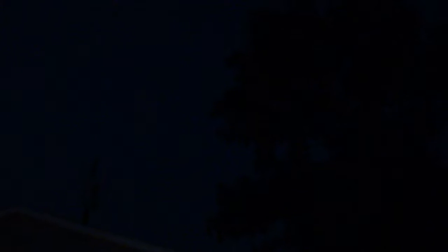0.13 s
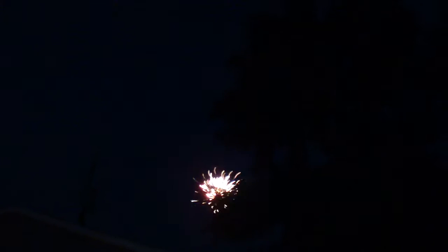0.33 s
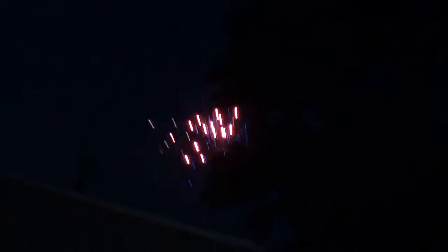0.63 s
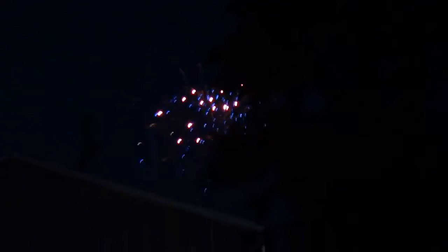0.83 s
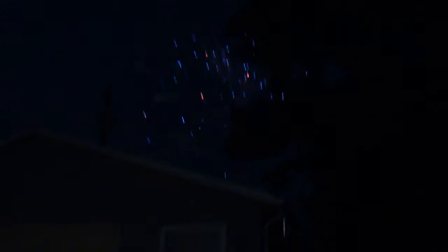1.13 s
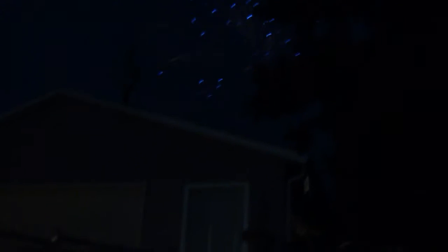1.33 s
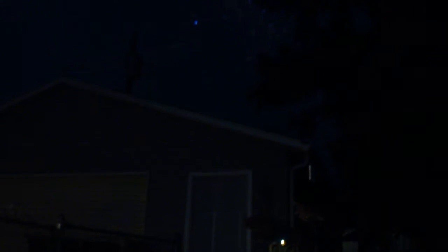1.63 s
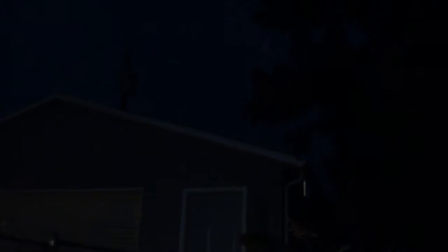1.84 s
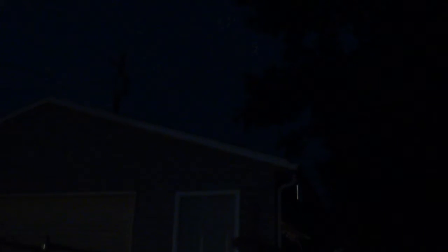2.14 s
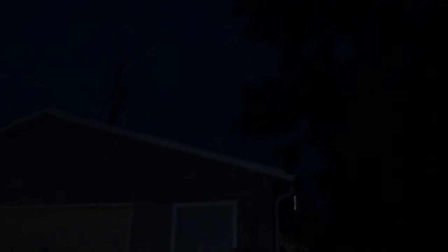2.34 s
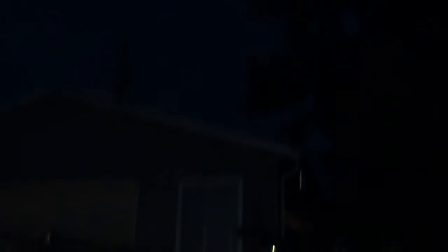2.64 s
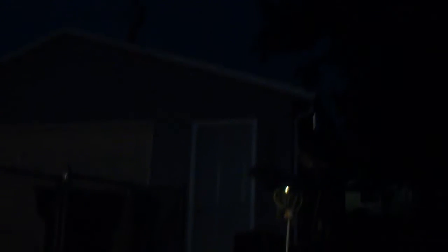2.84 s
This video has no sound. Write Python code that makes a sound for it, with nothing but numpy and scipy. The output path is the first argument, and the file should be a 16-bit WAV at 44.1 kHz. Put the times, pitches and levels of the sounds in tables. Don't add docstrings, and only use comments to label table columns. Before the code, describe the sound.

Over a constant low machine hum and fan rush in a residential yard, a single firework cracks violently, distorting the microphone, then booming echoes and a bright, airy tail fade before several dull distant shells thump.

```python
import sys
import numpy as np
from scipy import signal
from scipy.fft import rfft, irfft, next_fast_len
from scipy.io import wavfile
from scipy.ndimage import map_coordinates

SR = 44100
rng = np.random.default_rng(int(sys.argv[2]) if len(sys.argv) > 2 else 0)


def decibels_to_gain(level_db):
    exponent = np.asarray(level_db, float) / 20
    return 10 ** exponent


def transcribe(signal):
    frames = np.atleast_2d(signal).T
    limited = np.clip(frames, -1, 1)
    pcm = np.round(limited * 32767).astype(np.int16)
    wavfile.write(sys.argv[1], SR, pcm)


N = 130977

# t/s, level/dB, sign, push/ms, front/ms
BURST = [
    (.76416, -.5, -1, .6, .025),
    (.76465, 6.5, 1, .52, .05),
    (.76505, -1, 1, 1.4, .04),
    (.76562, -4.5, 1, 1.6, .05),
    (.7663, 10.5, -1, 1.1, 1.0),
    (.7677, 8, -1, .5, .5),
]
# t/s, level/dB, sign, push/ms, front/ms
HOUSE_SLAPS = [
    (.7884, 4, -1, 1.1, .5),
    (.794, -9, -1, .3, .04),
    (.7982, 2, -1, .7, .3),
    (.8013, -4, -1, .3, .02),
    (.8022, -2, 1, .6, .15),
    (.8493, -1, 1, .6, .1),
    (.8608, 2, -1, .9, .4),
    (.8712, -4, 1, .35, .1),
    (.8925, -2, -1, .5, .1),
    (.8942, -4, 1, .35, .08),
]
# t/s, level/dB
ECHO_SWELL = [
    (0.768, -25),
    (.785, -11.5),
    (.81, -16),
    (.87, -16),
    (.95, -20.5),
    (1.15, -23.5),
    (1.3, -28),
    (1.6, -31.5),
    (2.1, -39),
]
# f/Hz, level/dB
WALL_COLOUR = [(40, -39), (120, -15.5), (260, -0.5), (520, -12), (770, -7), (1100, -14.5), (2200, -16),
               (10900, -40.5)]
# f/Hz, change/(dB per s)
AIR_LOSS = [(200, 1.5), (1500, -1.5), (4000, -1), (10000, -21)]
# f/Hz, level/(dB per Hz)
LEAF_COLOUR = [(500, -30), (1500, 0), (3000, -1.5), (5000, -9.5), (10900, -28)]
# t/s, peak level/dB, f/Hz, t60/s
YARD_BOOMS = [
    (.7685, -15, 282, 0.058),
    (.787, -32, 272, 0.53),
    (.797, -15, 742, 0.16),
    (.82, -18, 276, 0.08),
    (.845, -23, 200.1, 0.51),
    (.99, -20.5, 192, 0.21),
    (1.05, -19, 299, .25),
    (1.11, -20.5, 389, 0.16),
    (1.17, -21.5, 210, 0.16),
]
# t/s, peak level/dB, f/Hz, t60/s
FAR_SHELLS = [
    (1.521, -8.5, 304, 0.03),
    (1.55, -10.5, 356, 0.048),
    (1.76, -27.5, 767, 0.25),
    (2.356, -17.5, 360, 0.085),
    (2.723, -18, 460, .05),
    (2.75, -14.5, 430, 0.057),
    (2.818, -12.5, 365, 0.029),
]
SHAFT_MULTIPLES = [9, 10, 11, 15, 18, 19, 21, 22, 23, 24, 26, 28, 30, 39, 40, 48, 49, 56, 72, 86, 88, 100,
                   150, 157, 163, 168, 174]
# rms level/dB, drift/(dB per s)
SHAFT_TONES = [(-43.5, -0.2), (-40.5, -1.7), (-49.5, 2.1), (-78, 7.5), (-38.5, -1.6), (-46.5, -1.2),
               (-43, 0.5), (-32.5, -1.74), (-47.5, 1), (-40.5, 0.54), (-54.5, -5.3), (-50, 0), (-49, -1.3),
               (-49, -7.5), (-55, 1.5), (-54, 2.1), (-54.5, 2), (-52, -3), (-59.5, .1), (-60.5, 0.3),
               (-62, -2), (-67, 1), (-70, -6), (-66, 1), (-74, 0.5), (-69, -1), (-71, -2)]
# f/Hz, level/(dB per Hz)
FAN_COLOUR = [(30, -29), (200, -6), (380, -8.5), (590, -6), (1100, -12.5), (2100, -15.5), (6500, -35.5),
              (10900, -39.5)]

SLAPS_PER_S, SLAP_SPREAD_DB, SLAP_SHARE = 900, 2.5, .3
ECHO_DB = 2
LEAVES_S, LEAVES_DB, LEAVES_RISE_S, LEAVES_T60_S = 0.772, -18.5, 0.075, 1.57
SHAFT_HZ, FAN_DB = 58.92, -26
MAINS_HZ, MAINS_DB = 50, -46
START_S, BASS_HZ, TOP_HZ, CLIP_LEVEL = .0555, 140, 10930, .715
DUCK_DB, DUCK_S = -6, .012
SAG_DB, SAG_S = -6, 0.25


def unit(x):
    return x / np.sqrt(np.mean(x ** 2) + 1e-20)


def along(points, hz):
    f, v = np.transpose(points)
    return np.interp(np.log(hz + 1), np.log(f + 1), v)


def wobble(rate):
    knots = rng.standard_normal(int(N * rate / SR) + 4)
    return map_coordinates(knots, [np.arange(N) * rate / SR])


def filtered(x, response):
    m = next_fast_len(N + 8192)
    return irfft(rfft(x, m) * response(np.fft.rfftfreq(m, 1 / SR)), m)[:N]


def coloured_noise(colour):
    return unit(filtered(rng.standard_normal(N), lambda hz: decibels_to_gain(along(colour, hz))))


def blast():
    t = np.arange(N) / SR
    out = np.zeros(N)
    for s, db, sign, push_ms, front_ms in [*BURST, *HOUSE_SLAPS]:
        lag_ms = np.clip(t - s, 0, .05) * 1000
        push = (1 - lag_ms / push_ms) * np.exp(-lag_ms / push_ms)
        front = 1 - np.exp(-lag_ms / front_ms)
        out += np.sign(sign) * decibels_to_gain(db) * push * front
    return out


def echoes():
    t = np.arange(N) / SR
    chance, size = rng.random(N), rng.exponential(1, N)
    sign = np.sign(rng.standard_normal(N))
    slaps = (chance < SLAPS_PER_S / SR) * decibels_to_gain(SLAP_SPREAD_DB * np.minimum(size, 2)) * sign
    wash = rng.standard_normal(N)
    source = np.sqrt(SLAP_SHARE) * unit(slaps) + np.sqrt(1 - SLAP_SHARE) * wash
    near = unit(filtered(source, lambda hz: decibels_to_gain(along(WALL_COLOUR, hz))))

    s, db = np.transpose(ECHO_SWELL)
    hz, frame_s, z = signal.stft(near, SR, nperseg=512)
    travel_s = np.clip(frame_s - s[0], 0, 1.2)
    loss_db = along(AIR_LOSS, hz)[:, None] * travel_s
    far = signal.istft(z * decibels_to_gain(loss_db), SR, nperseg=512)[1][:N]

    tail_db = -12 * np.clip(t - s[-1], 0, None)
    level_db = np.interp(t, s, db) + tail_db + ECHO_DB + 1.1 * wobble(25.62)
    onset = np.clip((t - s[0]) / 0.0024, 0, 1)
    return onset * decibels_to_gain(level_db) * far


def trees():
    lag = np.clip(np.arange(N) / SR - LEAVES_S, 0, None)
    level_db = LEAVES_DB - 60 * lag / LEAVES_T60_S + wobble(39.5)
    rise = 1 - np.exp(-lag / LEAVES_RISE_S)
    return decibels_to_gain(level_db) * rise * coloured_noise(LEAF_COLOUR)


def thumps():
    out = np.zeros(N + SR)
    t = np.arange(SR // 4) / SR
    partials = [(1, 1), (.7, .6), (1.4, .35), (.3, .5)]
    for s, db, hz, t60 in [*YARD_BOOMS, *FAR_SHELLS]:
        waver = np.cumsum(rng.standard_normal(len(t))) * .02
        ring = sum(gain * np.sin(2 * np.pi * ratio * hz * t + waver) for ratio, gain in partials)
        envelope = decibels_to_gain(db + 3.5 - 60 * t / t60) * (1 - np.exp(-t / 0.0042))
        out[round(s * SR):][:len(t)] += envelope * ring
    return out[:N]


def compressor():
    t = np.arange(N) / SR
    turn = 2 * np.pi * SHAFT_HZ * t + .03 * wobble(2) + .006 * wobble(40)
    tones = np.zeros(N)
    for k, (db, drift) in zip(SHAFT_MULTIPLES, SHAFT_TONES):
        level_db = db + 3 + drift * t + (1 + .02 * k) * wobble(7)
        tones += decibels_to_gain(level_db) * np.sin(k * turn + 2 * np.pi * rng.random())
    fan_level = decibels_to_gain(FAN_DB - 2.08 + 0.44 * wobble(3.96))
    blade_beat = 1 + 0.062 * np.sin(2 * turn)
    hum = decibels_to_gain(MAINS_DB) * np.sin(2 * np.pi * MAINS_HZ * t)
    return tones + hum + fan_level * blade_beat * coloured_noise(FAN_COLOUR)


def scene():
    return (blast() + echoes() + trees() + thumps() + compressor())[None]


def band_limit(x):
    return signal.sosfilt(signal.butter(12, 10920, fs=SR, output="sos"), x)


def record(dry):
    t = np.arange(N) / SR
    after = np.clip(t - BURST[-1][0], 0, None)
    duck_db = DUCK_DB * np.exp(-after / DUCK_S) + SAG_DB * np.exp(-after / SAG_S)
    duck_db = duck_db * np.clip(after / 0.0052, 0, 1)
    x = filtered(dry[0], lambda hz: (hz < TOP_HZ) * (1j * hz / (BASS_HZ + 1j * hz)) ** 2)
    x = np.clip(x * decibels_to_gain(duck_db), -CLIP_LEVEL, CLIP_LEVEL)
    mix = x * np.clip((t - START_S) / 0.0044, 0, 1)
    return band_limit(mix[None])


dry = scene()
out = record(dry)
transcribe(out)
```